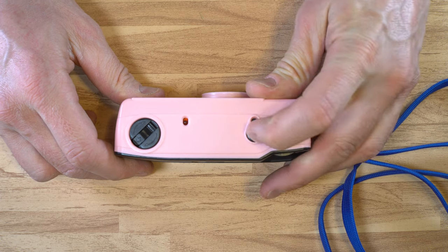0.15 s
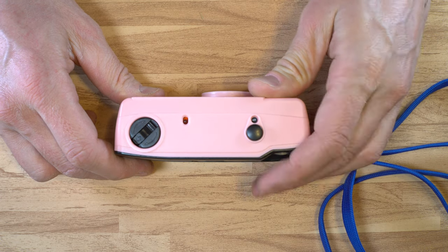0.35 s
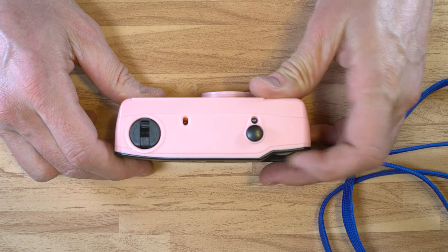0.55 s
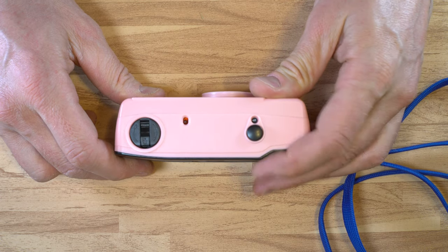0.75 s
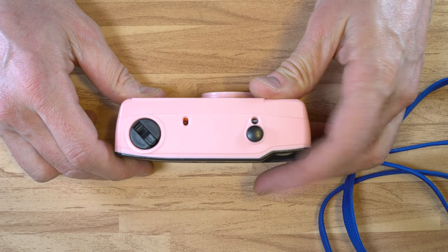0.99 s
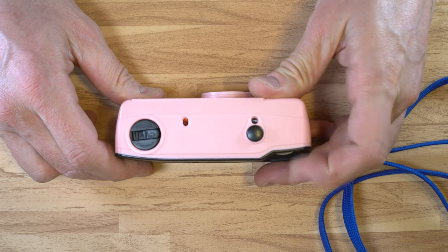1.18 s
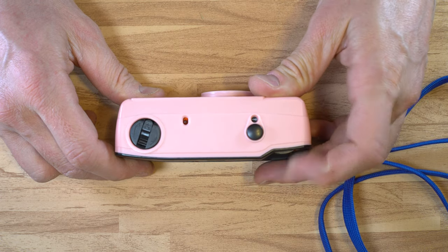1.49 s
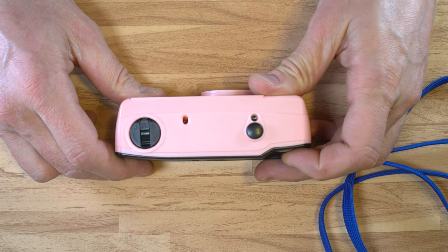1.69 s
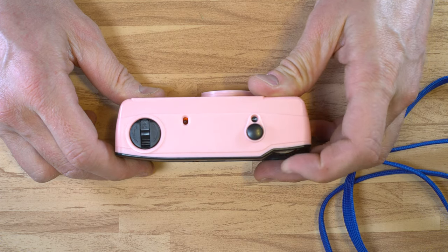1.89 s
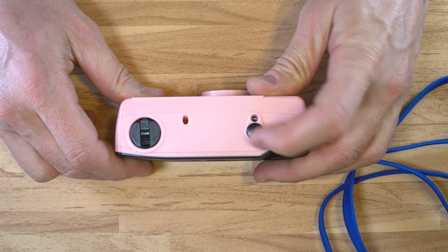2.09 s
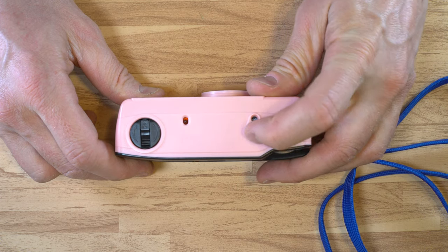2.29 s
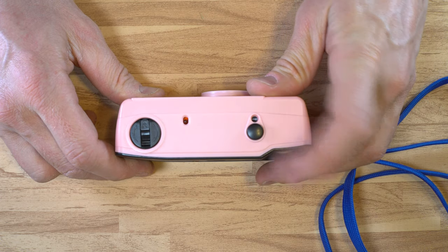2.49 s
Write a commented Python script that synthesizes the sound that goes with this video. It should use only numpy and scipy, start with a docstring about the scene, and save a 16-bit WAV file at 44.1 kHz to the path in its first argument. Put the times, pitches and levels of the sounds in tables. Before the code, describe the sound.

Plastic film camera being fired and wound, heard close in a quiet room with a faint low murmur. A crisp shutter snap at 0.12 s, with a faint button return near 0.3. Bright, rapid ratchet bursts follow at about 0.6, 0.9, 1.15, 1.4 and 1.7 s, the last hitting a stop, with skin rubs and low table bumps. A soft tap at 2.1, second snap at 2.38, button click at 2.53.

```python
"""In a quiet room, a small plastic film camera held over a wooden table is fired, wound on and fired again.
Five thumb strokes drag a pawl over the ratchet teeth; the wheel settles back and the last stroke ends on a stop.
The shutter snaps in three quick blows and its button springs back; skin rubs, fingers tap, hands bump the table.
Each contact is a burst of micro-impacts coloured by the struck part; shell, spring and table add ringing modes.
Quick reflections, a short room tail and a steady murmur of air lie behind."""
import sys
import numpy as np
from scipy import signal
from scipy.fft import rfft, irfft
from scipy.io import wavfile

SR = 44100
rng = np.random.default_rng(int(sys.argv[2]) if len(sys.argv) > 2 else 0)


def bounce(signal):
    """Save signal as a 16-bit WAV file at the path given by the first command-line argument."""
    frames = np.transpose(np.atleast_2d(signal))
    limited = np.clip(frames, -1, 1)
    pcm = np.round(limited * 32767).astype(np.int16)
    wavfile.write(sys.argv[1], SR, pcm)


N = 116865  # length in samples

# Tables of blows have four columns: t/s, relative level/dB, treble tilt/(dB per octave), bass/dB.
# Colour tables are spectra of a struck part or of the air: f/Hz, relative level/dB.

# skin on plastic, for rubs and fingertips: f/Hz, relative level/dB
SKIN_COLOUR = [(100, -20), (400, -8), (1100, 0), (1700, -9), (2600, -7), (4500, -16), (7000, -17),
               (10000, -26), (16000, -30)]


def amp(db):
    """Decibels to gain."""
    return 10 ** (np.asarray(db) / 20)


def unit(x):
    """Scales to rms 1."""
    return x / np.sqrt(np.mean(x ** 2) + 1e-20)


def read(points, hz):
    """Reads a table on a log-frequency axis."""
    f, value = np.transpose(points)
    return np.interp(np.log(hz + 1), np.log(f), value)


def add(mix, s, sound):
    """Mixes a sound in at time s."""
    part = mix[max(round(s * SR), 0):][:len(sound)]
    part += sound[:len(part)]


def causal(gain):
    """Minimum-phase impulse response of energy 1: it has the shape of this gain and starts at once."""
    log_gain = np.log(np.maximum(np.r_[gain, gain[-2:0:-1]], 1e-6))
    spectrum = np.exp(np.conj(signal.hilbert(log_gain)))[:len(gain)]
    h = irfft(spectrum)
    return h / np.linalg.norm(h)


def chatter(envelope, count=4):
    """Dense micro-impacts: noise under an envelope, repeatedly flattened towards an even spectrum."""
    x = rng.standard_normal(len(envelope)) * envelope
    for _ in range(count):
        z = rfft(x)
        flat = irfft(z / (abs(z) + 1e-12), len(x))
        x = flat * envelope ** .5
    return unit(x) * np.sqrt(np.mean(envelope ** 2))


def clicks(rows, colour, rise_s, hold_s, fall_s, ring_db, ring_s, size=4096):
    """Each blow chatters for a moment and dies away in the part that was struck."""
    ripple_db, ripple_hz = 2.6, 520  # depth and width of small resonances that change from blow to blow
    out, t, hz = np.zeros(N), np.arange(size) / SR, np.fft.rfftfreq(size, 1 / SR)
    attack = np.minimum((t + 1 / SR) / rise_s, 1)
    decay = np.exp(-np.maximum(t - hold_s, 0) / fall_s)
    envelope = attack * (decay + amp(ring_db) * np.exp(-t / ring_s))
    lag = t * ripple_hz
    for s, db, tilt, bass_db in rows:
        wander = rfft(rng.standard_normal(size) * lag ** 2 * np.exp(-4 * lag ** 2)).real
        ripple = ripple_db * unit(wander) * np.minimum(hz / 2000, 1)  # fades out below 2 kHz
        treble = tilt * np.log2(np.maximum(hz, 700))
        bass = bass_db / (1 + (hz / 560) ** 4)
        part = causal(amp(read(colour, hz) + ripple + treble + bass))
        add(out, s, amp(db) * signal.fftconvolve(chatter(envelope), part))
    return out


def ring(x, modes):
    """Adds the ringing of a set of modes, each a decaying resonator driven by the sound."""
    out = x
    for hz, db, t60 in modes:
        r = np.exp(-np.log(1000) / (t60 * SR))
        pole = r * np.exp(2j * np.pi * hz / SR)
        out = out + 2 * amp(db) * signal.lfilter([1 - r], [1, -pole], x).real
    return out


def ratchet():
    """The pawl drops off one tooth after another and its spring rings on."""
    # pawl dropping off a tooth: t/s, relative level/dB, tilt/(dB per octave), bass/dB
    drops = [(.5773, -4, 0, -3), (.5958, 0, 1, -3), (.6085, -2, 1, -3), (.6170, -2, 1, -3),
             (.6240, -2, 1, -3), (.6300, -2, 1, -3), (.6360, -1, 0, -3), (.6433, -4, 0, -3),
             (.8891, -6, -1, -5), (.8988, -2, 0, -5), (.9074, -3, 0, -5), (.9157, -3, 0, -5),
             (.9235, -3, 0, -4), (.9320, -3, -1, -3), (1.1452, -1, 1, -3), (1.1565, -1, 1, 0),
             (1.1654, -2, 0, 0), (1.1733, -4, 0, 2), (1.1810, -3, 0, 4), (1.1915, -5, -1, 4),
             (1.4148, -7, -1, 3), (1.4247, -4, 0, 9), (1.4309, -1, -.5, 8), (1.4356, -1, -.5, 8),
             (1.4398, 0, -.5, 8), (1.4445, -3, -.5, 8), (1.4485, -4, -1, 8), (1.4584, -4, -1, 6),
             (1.7030, -2, 0, 6), (1.7143, -4, 0, 4), (1.7238, -2, 0, 4), (1.7328, -3, 0, 4),
             (1.7430, -1, 0, 4)]
    # pawl on tooth: f/Hz, relative level/dB
    tooth_colour = [(100, -34), (230, -39), (350, -13), (500, -16.5), (620, -3), (760, -20.5), (1130, 2.5),
                    (1400, -8), (1800, -14), (2250, -2.5), (2800, -2.5), (3400, -12.5), (4600, -8.5),
                    (6400, -8), (7600, -0.5), (8800, -11.5), (10000, -5), (11400, -8), (12600, 4),
                    (14300, -1), (16000, -9)]
    # ringing of the pawl spring: f/Hz, gain/dB, t60/s
    spring = [(7600, -3, .025), (12170, -8, .06), (12310, -8, .06), (12475, -3, .07), (13350, -5, .035),
              (13810, -8, .05), (14336, -10, .05)]
    teeth = clicks(drops, tooth_colour, rise_s=.0009, hold_s=.0032, fall_s=.0016, ring_db=-25, ring_s=.006)
    return amp(-24.5) * ring(teeth, spring)


def wheel():
    """The wheel catches, settles back against the pawl and hits its stop, each contact with its own colour."""
    # wheel hitting its stop: t/s, relative level/dB, tilt/(dB per octave), bass/dB
    stop_rows = [(1.7564, -12.5, 0, -11)]
    # pawl catching part way up a tooth: t/s, relative level/dB, tilt/(dB per octave), bass/dB
    catch_rows = [(1.2055, -34, -1.5, -3.5), (1.2085, -33, -2.5, 0.5), (1.2115, -45.5, -7, -4.5),
                  (1.361, -44, 0, 6), (1.6607, -44, 0, 6)]
    # wheel settling back against the pawl: t/s, relative level/dB, tilt/(dB per octave), bass/dB
    settle_rows = [(.206, -49.5, 4.5, 18), (.654, -48.5, -1, 5), (.658, -40.5, 2.5, 16),
                   (.667, -43, 13.5, 21), (.988, -40.5, 2.5, -14), (.9935, -45.5, 6, 14),
                   (1.104, -48, -9, 28), (1.256, -48, -7.5, -9), (1.2622, -39.5, 4, 8),
                   (1.559, -45.5, 1.5, -1), (1.5645, -37, 4, 13), (1.9022, -40, -0.5, -31),
                   (1.972, -52, -0.5, -12), (2.364, -39, 1, -4.5), (2.370, -44.5, 0.5, -8)]
    # wheel on its stop: f/Hz, relative level/dB
    stop_colour = [(100, -30), (240, -31), (370, -7.5), (470, -17), (600, -5), (700, -15.5), (830, 1),
                   (1250, -5), (1550, -11.5), (2100, -12.5), (2750, -8.5), (3600, -12.5), (5600, -14),
                   (7700, -5.5), (9000, -18), (12500, -13.5), (16000, -20)]
    # pawl on the flank of a tooth: f/Hz, relative level/dB
    catch_colour = [(100, -24.5), (360, -13), (470, -13.5), (620, 5), (780, -7.5), (1050, -2.5),
                    (1600, -12), (2200, 2), (3200, -13), (5000, -5), (10000, -11.5), (13000, -20.5),
                    (16000, -20)]
    # wheel on the resting pawl: f/Hz, relative level/dB
    settle_colour = [(100, -36.5), (450, -21), (620, -7), (730, -9.5), (1130, 6), (1400, -2.5),
                     (1800, -14.5), (2700, -19), (5500, -22), (9000, -30), (16000, -44.5)]
    stop = clicks(stop_rows, stop_colour, rise_s=.0006, hold_s=.0019, fall_s=.0028, ring_db=-26, ring_s=.006)
    catches = clicks(catch_rows, catch_colour, rise_s=.0006, hold_s=.0026, fall_s=.0028,
                     ring_db=-22, ring_s=.006)
    settles = clicks(settle_rows, settle_colour, rise_s=.002, hold_s=.0035, fall_s=.0018,
                     ring_db=-26, ring_s=.006)
    return stop + catches + settles


def shutter():
    """The button is pressed, the lever trips, the blade opens and snaps shut, and the button returns."""
    # lever tripping and blade flying open: t/s, relative level/dB, tilt/(dB per octave), bass/dB
    open_rows = [(.1196, -19.5, 0, -3), (.1238, -17.5, 1, -3), (2.3758, -18.5, -1, 0), (2.3801, -16, 0, 0)]
    # blade snapping shut: t/s, relative level/dB, tilt/(dB per octave), bass/dB
    shut_rows = [(.1328, -18, 0, -3), (2.3890, -19, 0.5, 0)]
    # button sliding and springing back: t/s, relative level/dB, tilt/(dB per octave), bass/dB
    button_rows = [(.104, -49.5, 1.5, -6), (.1155, -37, 1.5, 12), (.269, -49.5, -7, -15),
                   (.274, -54, 5.5, 8), (.280, -52.5, -10, -6), (.2975, -42, -0.5, 4),
                   (2.513, -52.5, -15, 10), (2.5195, -48, -6, 9), (2.5325, -34, 3.5, 2)]
    # lever and opening blade: f/Hz, relative level/dB
    open_colour = [(30, -65.5), (150, -32), (480, -33.5), (630, -13.5), (850, -8), (1150, 0), (1400, -9),
                   (1650, -20), (2100, -3.5), (2650, 1), (3100, -6.5), (4000, -13.5), (4750, -2.5),
                   (5500, -9), (8000, -10), (12000, -15), (16000, -27.5)]
    # closing blade: f/Hz, relative level/dB
    shut_colour = [(30, -67.5), (200, -17.5), (500, -18.5), (800, -3.5), (1120, -1), (1600, -8),
                   (2600, -15.5), (5000, -4.5), (7500, -1), (10500, -0.5), (16000, 3)]
    # button: f/Hz, relative level/dB
    button_colour = [(100, -41.5), (450, -41.5), (850, -9.5), (1200, -11), (1650, -16), (2200, -14),
                     (2620, 2.5), (3050, -12.5), (3400, -12), (3750, -16), (4200, -13.5), (5100, -21),
                     (5700, -16), (6800, -22.5), (9000, -34.5), (16000, -48)]
    opening = clicks(open_rows, open_colour, rise_s=.00078, hold_s=.0025, fall_s=.002,
                     ring_db=-27.5, ring_s=.007)
    shutting = clicks(shut_rows, shut_colour, rise_s=.0004, hold_s=.003, fall_s=.0069,
                      ring_db=-16.5, ring_s=.01)
    button = clicks(button_rows, button_colour, rise_s=.0019, hold_s=.0051, fall_s=.0049,
                    ring_db=-20.5, ring_s=.0029)
    return opening + shutting + button


def camera():
    """The whole mechanism rings the plastic shell around it."""
    # ringing of the plastic shell: f/Hz, gain/dB, t60/s
    shell = [(838.5, -6.5, 0.091), (1056, -12, 0.02), (1272, -9, 0.05), (1920, -3.5, .1),
             (2420, -13, 0.036), (2770, -8, 0.09), (4206, -1.5, 0.022)]
    return ring(ratchet() + wheel() + shutter(), shell)


def thumb():
    """Skin drags over the ridged wheel in small grains as it takes up the slack."""
    # rubs: start t/s, length/s, relative level/dB
    rubs = [(0.84, 0.095, -61), (1.097, 0.095, -59.5), (1.365, 0.04, -57.5), (1.669, 0.058, -61.5)]
    out = np.zeros(N)
    grip = causal(amp(read(SKIN_COLOUR, np.fft.rfftfreq(2048, 1 / SR))))
    for s, length, db in rubs:
        n = round(length * SR)
        grain_db = 4 * np.repeat(rng.standard_normal(N), 64)[:N]  # a new level every 64 samples
        grains = rng.standard_normal(N) * amp(grain_db)
        stroke = unit(grains[:n]) * signal.windows.tukey(n, .2)
        add(out, s, amp(db) * signal.fftconvolve(stroke, grip))
    return out


def fingertips():
    """Fingertips touch down on the camera with soft, dull contacts."""
    # touches: t/s, relative level/dB, tilt/(dB per octave), bass/dB
    touches = [(.058, -53, -3.5, -9), (.075, -57, -2.5, -9), (.431, -52, -3.5, -7), (.8405, -56, -4, -3),
               (2.186, -55, -3.5, -9)]
    return clicks(touches, SKIN_COLOUR, rise_s=.002, hold_s=.0025, fall_s=.005, ring_db=-27.5, ring_s=.006)


def hands(size=16384):
    """A finger taps the case; table bumps are sinking thuds with a little rumble; low modes boom after."""
    # finger tapping the case: t/s, relative level/dB, tilt/(dB per octave), bass/dB
    taps = [(2.1114, -42, 0, 0)]
    # finger on the case: f/Hz, relative level/dB
    tap_colour = [(100, -12), (350, -1), (550, 0), (1200, -7), (2000, -3), (4000, -7), (5500, -19),
                  (9000, -26), (16000, -37)]
    # hands bumping the table: t/s, relative level/dB
    bumps = [(.43, -58), (.842, -44.5), (1.102, -47), (1.19, -62), (1.365, -59), (1.57, -60.5),
             (1.665, -57), (1.76, -60), (1.89, -66), (2.09, -64.5), (2.385, -65.5)]
    # rumble of the table: f/Hz, relative level/dB
    bump_colour = [(20, -36), (50, -28.5), (78, 2.5), (105, -17.5), (135, -15), (175, -20), (240, -30),
                   (600, -38.5), (2000, -47), (16000, -74.5)]
    # low booms after a bump: f/Hz, gain/dB, t60/s
    boom = [(80.3, -8.5, 0.88), (123.6, 5, 0.27), (169.3, 2, 0.28)]
    thud_hz, start_hz, glide_s = 76, 120, .016  # a thud sinks towards its lowest note
    out = clicks(taps, tap_colour, rise_s=.0006, hold_s=.002, fall_s=.0018, ring_db=-24, ring_s=.006)
    t = np.arange(size) / SR
    table = causal(amp(read(bump_colour, np.fft.rfftfreq(size, 1 / SR))))
    push = np.minimum(t / .0043, 1) * np.exp(-np.maximum(t - .045, 0) / .027)
    pitch_hz = thud_hz + (start_hz - thud_hz) * np.exp(-t / glide_s)
    thud = push * np.sin(2 * np.pi * np.cumsum(pitch_hz) / SR)
    for s, db in bumps:
        rumble = signal.fftconvolve(chatter(push), table)[:size]
        add(out, s, amp(db) * (amp(-2.5) * thud + amp(-5) * rumble))
    return ring(out, boom)


def room(x, early_db, early_s, tail_db, delay_s, size=32768):
    """Quick reflections from the table and hands, then the short tail of the room, both of decaying noise."""
    # decay of the room: f/Hz, t60/s
    room_t60 = [(200, 0.65), (800, 0.36), (2000, 0.35), (5500, 0.35), (10000, 0.36), (15000, 0.4156)]
    # colour of the tail: f/Hz, relative level/dB
    room_colour = [(100, 1), (600, 3.5), (1200, -2), (2500, 2), (6000, 1.5), (10000, -2), (15000, -3.5)]
    t = np.arange(size) / SR
    hz, at, z = signal.stft(rng.standard_normal(size), SR, nperseg=256)
    decay_db = -60 * at / read(room_t60, hz)[:, None]
    z = z * amp(read(room_colour, hz)[:, None] + decay_db)
    onset = np.clip(t / delay_s - .5, 0, 1)  # fades in around the delay
    tail = signal.istft(z, SR, nperseg=256)[1][:size] * onset
    early = rng.standard_normal(size) * np.exp(-t / early_s) * onset
    h = amp(tail_db) * tail / np.linalg.norm(tail) + amp(early_db) * early / np.linalg.norm(early)
    return signal.fftconvolve(x, h)[:N]


def air():
    """Steady low murmur of the room's air with faint hiss: noise shaped by a fixed spectrum."""
    # murmur of the air: f/Hz, relative level per Hz/dB
    air_colour = [(20, -29), (50, -19), (80, -3.5), (125, -5), (220, -17.5), (400, -16), (520, -10),
                  (610, -5.5), (720, -18), (800, -11.5), (900, -13), (1080, -16.5), (1350, -21),
                  (1900, -24), (2600, -24), (3600, -32.5), (5300, -35), (16000, -39)]
    spectrum = rfft(rng.standard_normal(N)) * amp(read(air_colour, np.fft.rfftfreq(N, 1 / SR)))
    return amp(-63.5) * unit(irfft(spectrum, N))


def scene():
    """The camera and hands in the room."""
    close = amp(-1.5) * camera() + thumb() + fingertips() + amp(-2.5) * hands()
    reflections = room(close, early_db=-7, early_s=.012, tail_db=-19.5, delay_s=.0011)
    return (close + reflections + air())[None]


def record(dry):
    """A steep low-pass takes off the treble above 15.9 kHz."""
    lowpass = signal.firwin(255, 15900, window=("kaiser", 8), fs=SR)
    return signal.oaconvolve(dry, lowpass[None], "same")


dry = scene()
out = record(dry)
bounce(out)
```